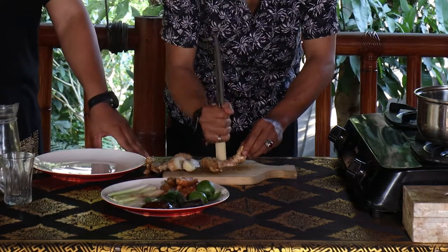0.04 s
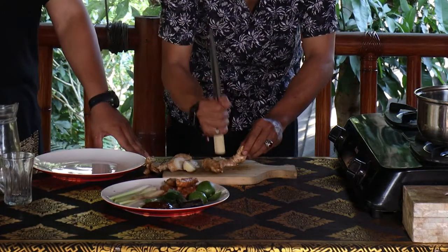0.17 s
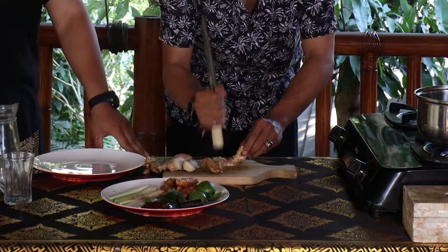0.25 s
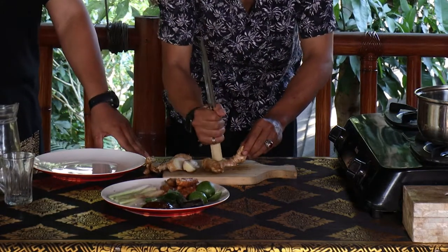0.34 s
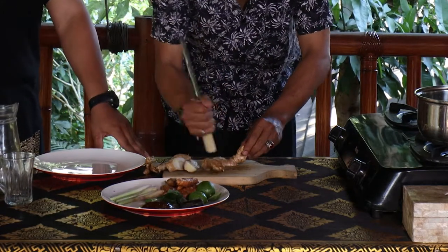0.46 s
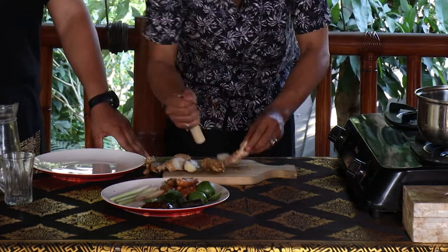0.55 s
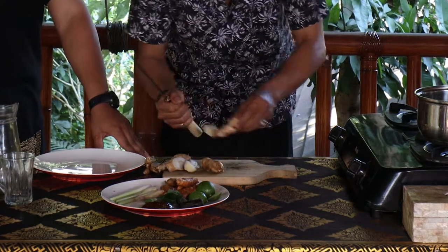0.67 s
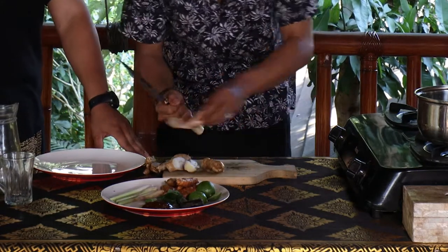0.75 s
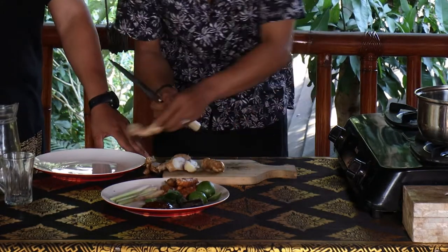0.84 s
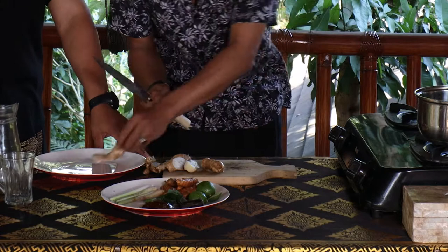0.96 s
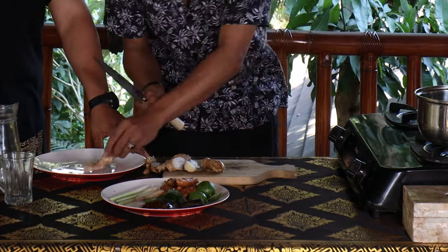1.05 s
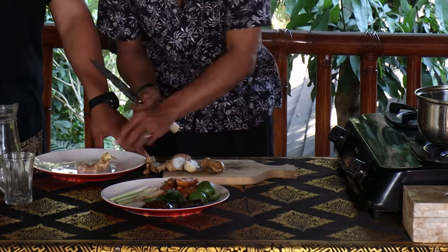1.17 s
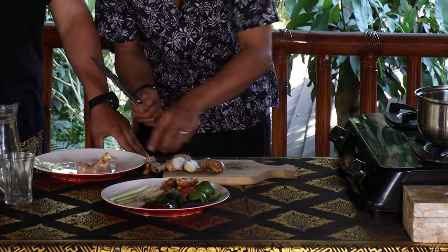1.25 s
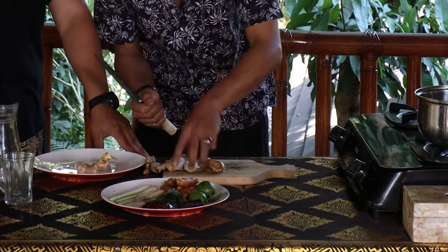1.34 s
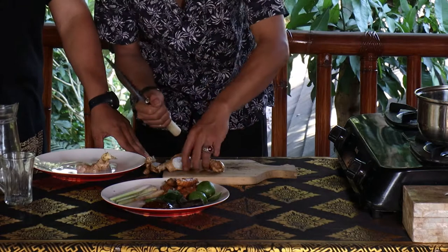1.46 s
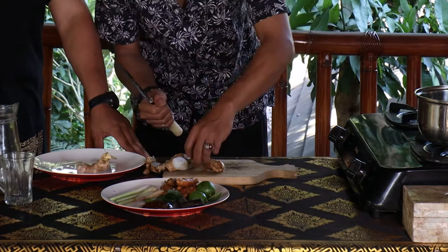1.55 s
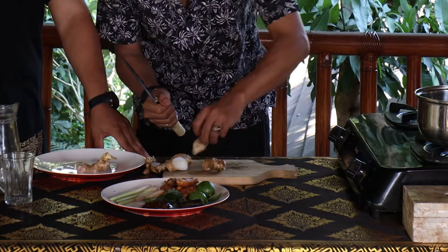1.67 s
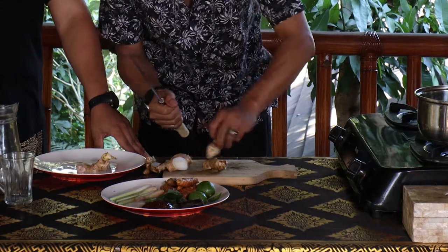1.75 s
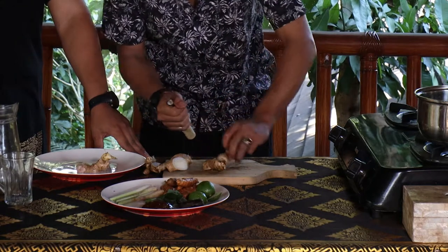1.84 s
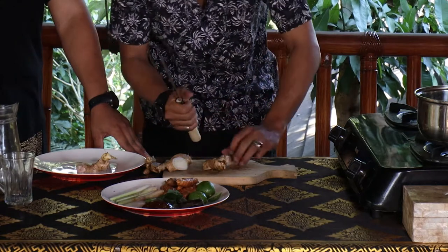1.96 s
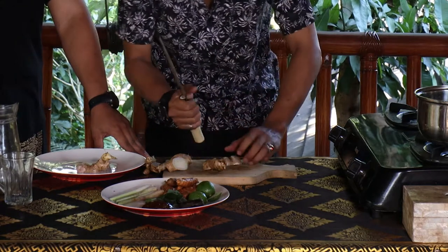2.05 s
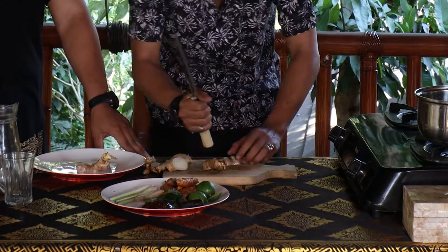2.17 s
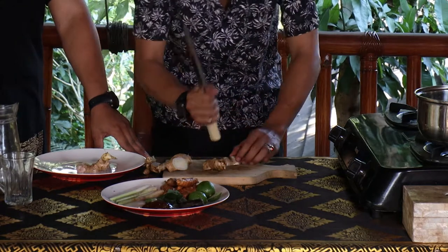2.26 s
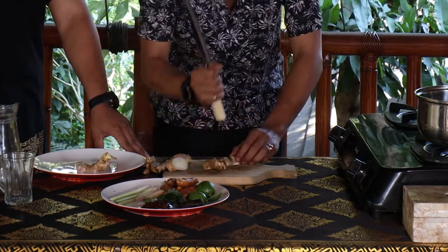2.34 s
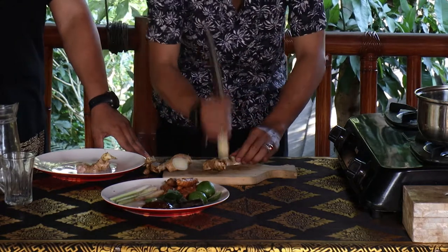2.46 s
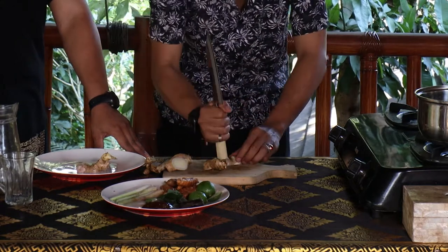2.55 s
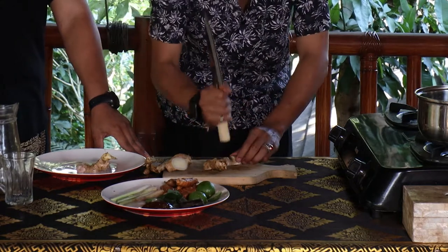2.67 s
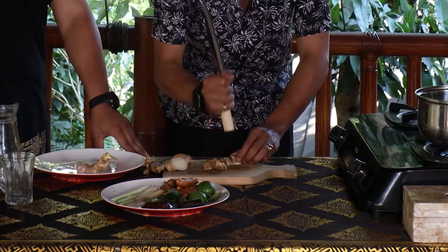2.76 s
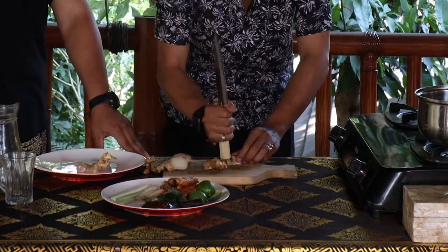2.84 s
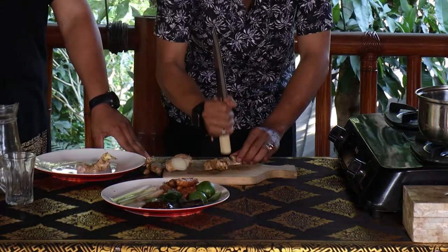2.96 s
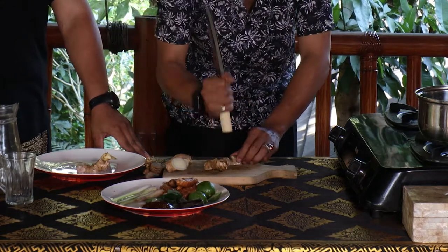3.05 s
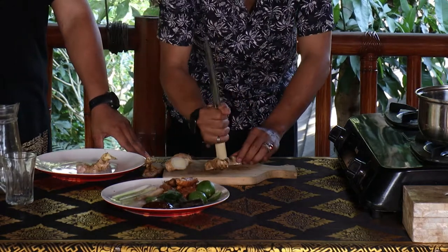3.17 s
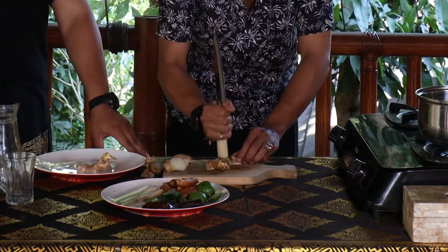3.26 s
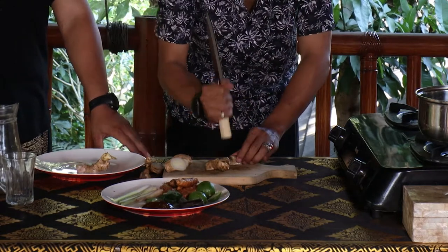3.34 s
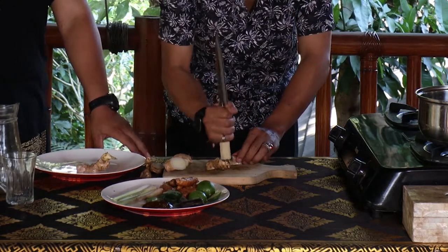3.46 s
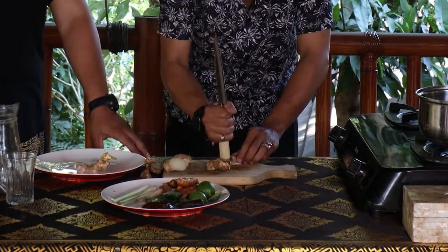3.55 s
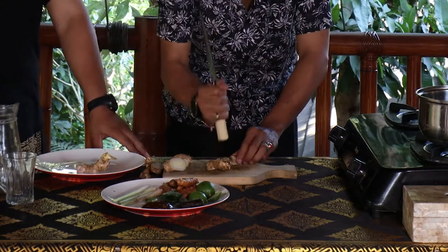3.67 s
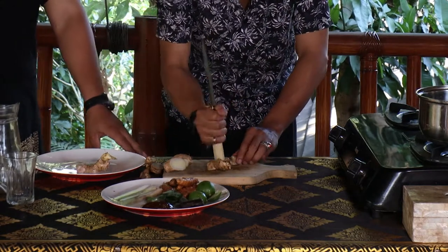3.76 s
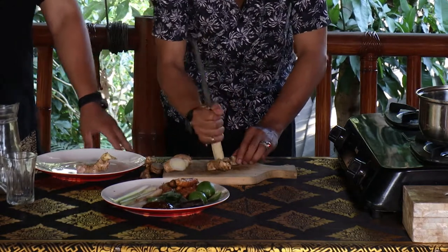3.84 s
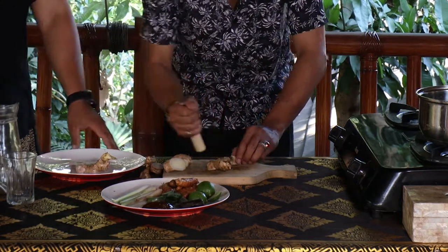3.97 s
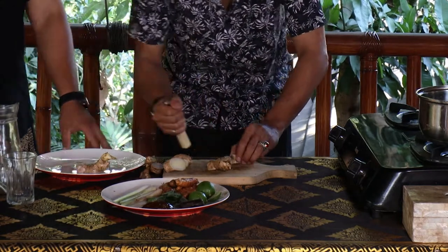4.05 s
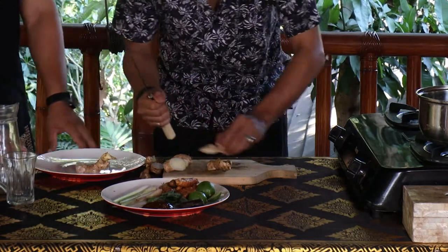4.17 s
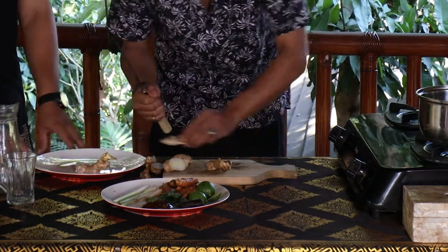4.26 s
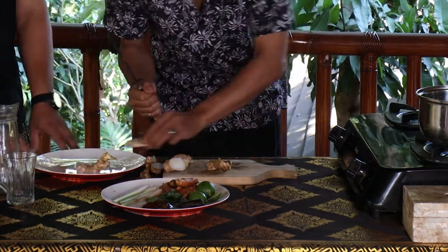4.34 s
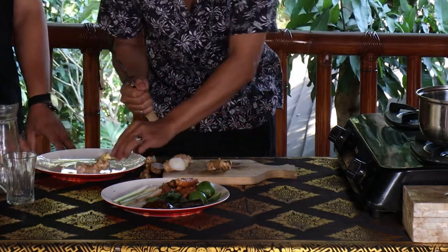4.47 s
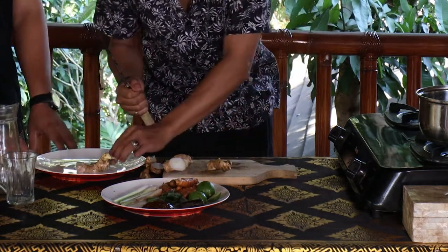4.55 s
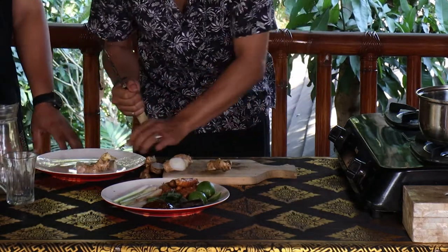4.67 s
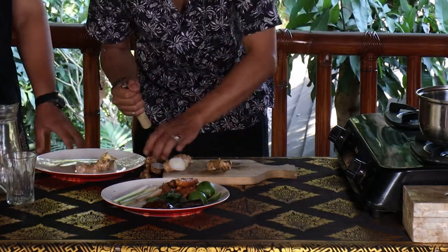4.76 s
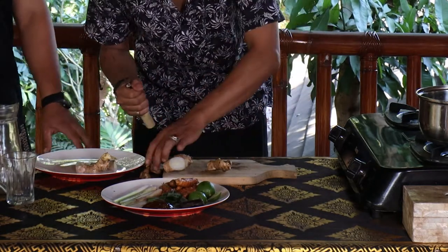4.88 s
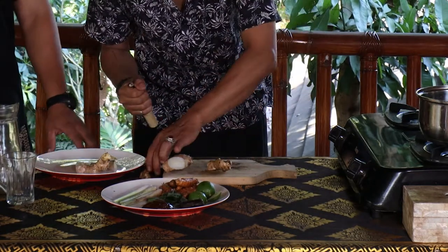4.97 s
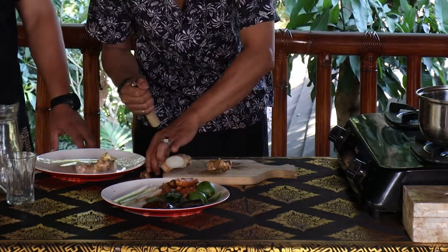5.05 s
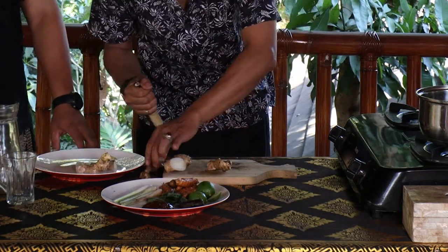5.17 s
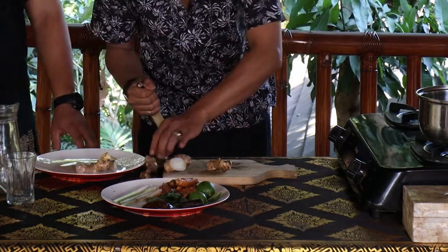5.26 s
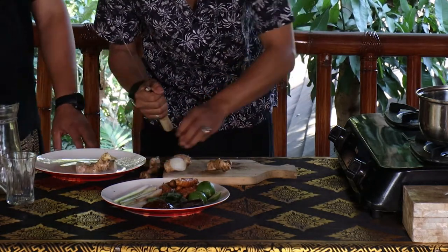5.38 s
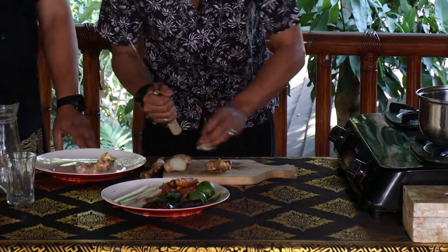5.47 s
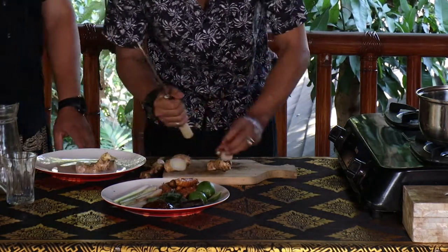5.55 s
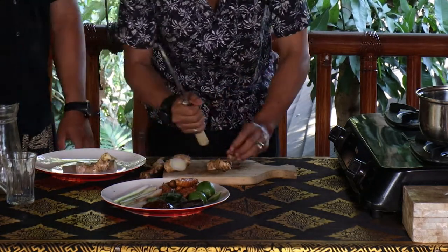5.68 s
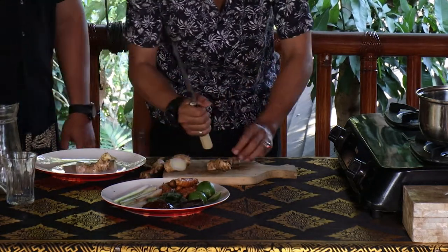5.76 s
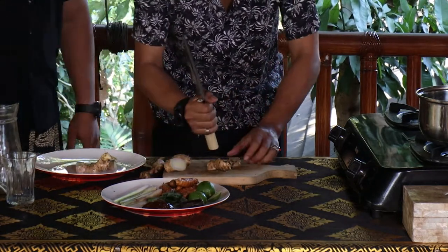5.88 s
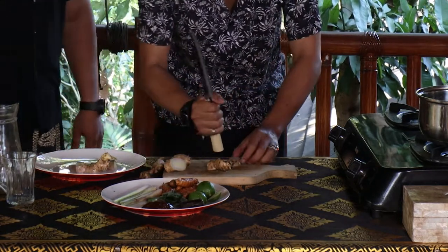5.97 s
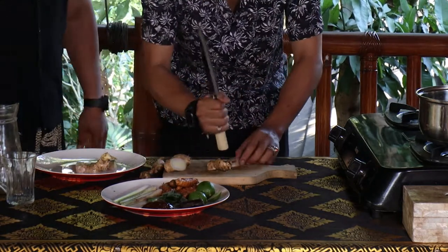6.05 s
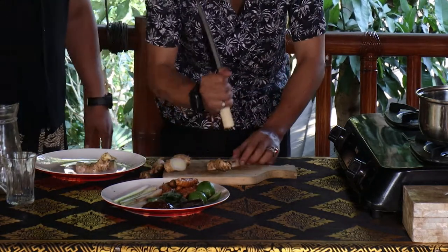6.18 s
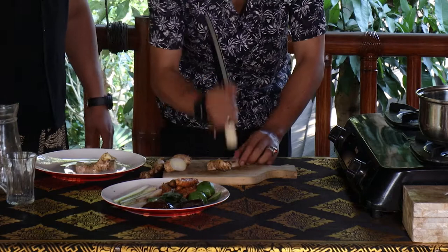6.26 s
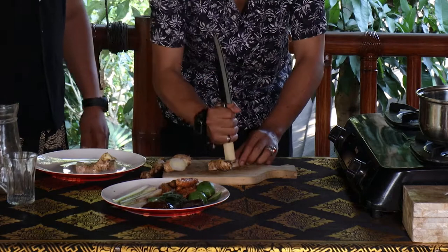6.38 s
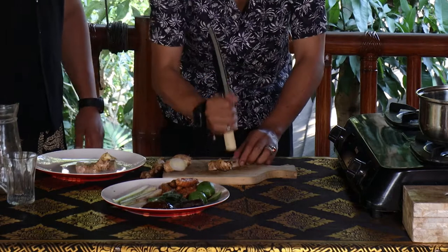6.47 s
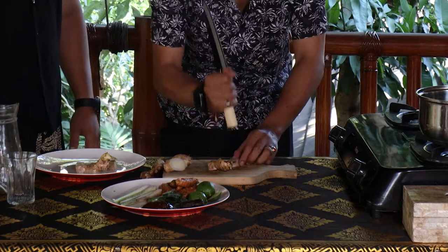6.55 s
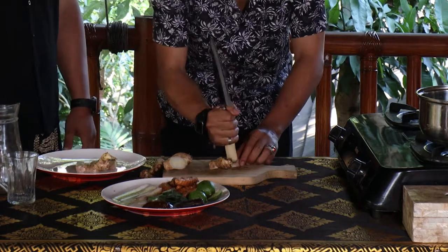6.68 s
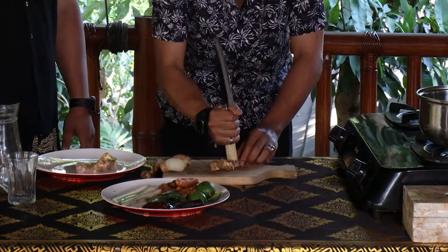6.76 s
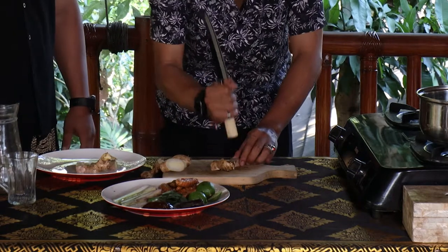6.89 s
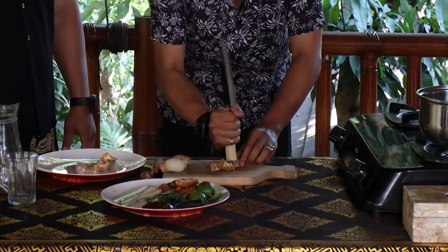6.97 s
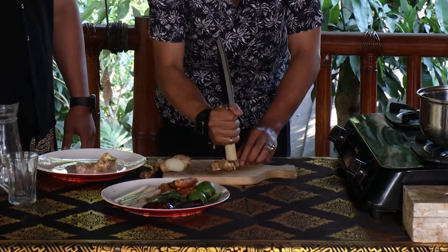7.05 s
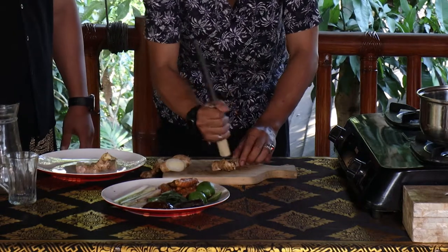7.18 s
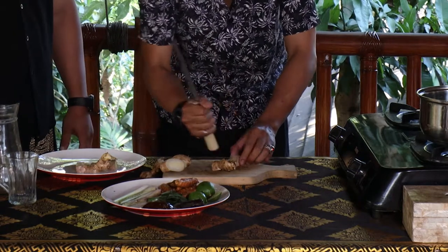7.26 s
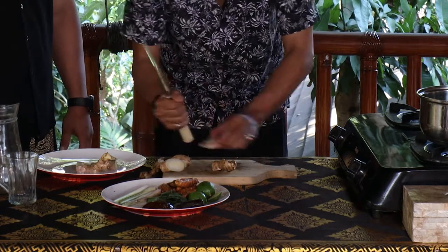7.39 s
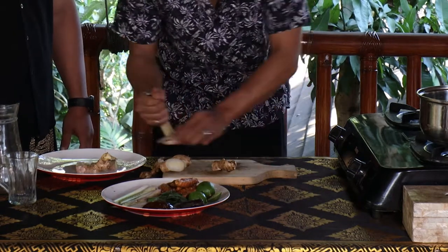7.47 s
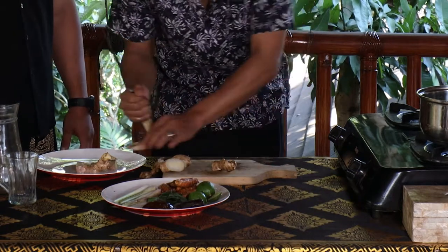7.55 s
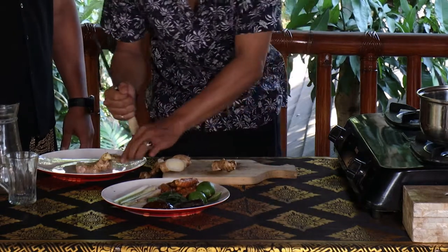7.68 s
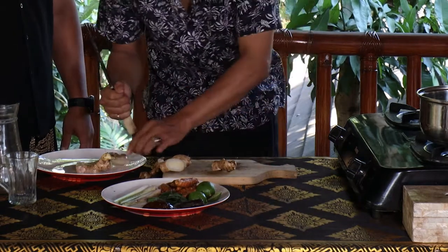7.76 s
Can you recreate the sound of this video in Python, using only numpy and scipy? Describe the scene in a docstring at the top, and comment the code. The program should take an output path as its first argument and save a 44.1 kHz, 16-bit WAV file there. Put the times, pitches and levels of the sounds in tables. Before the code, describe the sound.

On an open veranda with faint insects and the odd distant bird, ginger is pounded with a knife handle on a wooden board in front of the microphone. The loud, clacking thuds come in runs of two, five and three, making the table boom, dishes rattle and a pot and the blade ring slightly. Between runs, fingers sort the pieces with quiet taps, rustles, tiny clicks and one brief plate clink.

```python
"""On an open veranda, a knife butt smashes ginger on a wooden board: two blows, then hands sort the pieces.
Five more blows follow, more sorting with one clink of a plate, and a last three blows.
At each blow the board thuds, buzzes, lifts and slaps down again; the table booms, dishes rattle,
and a pot and the blade ring on. All the while there are small bright clicks, and insects sing in the
garden, where a few far birds call."""
import sys
import numpy as np
from scipy import signal
from scipy.fft import rfft, irfft, next_fast_len
from scipy.io import wavfile

SR = 44100
rng = np.random.default_rng(int(sys.argv[2]) if len(sys.argv) > 2 else 0)


def to_wav(s):
    """Save 16-bit WAV."""
    ch = np.atleast_2d(s).T  # columns
    pcm = np.round(np.clip(ch, -1, 1) * 32767)  # PCM
    wavfile.write(sys.argv[1], SR, pcm.astype(np.int16))


N = 344862

# The knife blows. Each row: start in seconds, force in dB, hardness in dB, seconds until the board
# lands, then the strength in dB of the landing, the pot's ring and the blade's ring.
KNIFE_BLOWS = [(.0821, -.5, 1.5, 0.051, -2.5, -20, -9), (0.3633, -.5, -7, 0.049, -3.5, -27, -5),
               (2.5551, -1.5, -3, 0.048, -1.5, -14, 1), (2.8958, 0, -1.5, 0.05, -2, -13, -1),
               (3.2127, 0, -4, 0.049, -1, -10, -5), (3.5176, 1.5, -3, 0.05, -.5, -6, -11),
               (3.8015, -1, -11, .056, -8.5, -15, -14), (6.3664, -3, -9.5, 0.047, -5.5, -15, -14),
               (6.722, 1, -6, .0545, 2.5, 0.5, -3), (7.0439, -1, -8, 0.052, 0.5, -4, -4)]

# The tones of struck things. Each row: pitch in Hz, relative level in dB, seconds to fade by 60 dB.
BOARD_TONES = [(203, 2, 0.014), (378, -1, 0.014), (630, -10, 0.021), (831, -14.5, 0.061)]
SLAP_TONES = [(327.4, 1, 0.033), (474, 0, 0.015), (738, 0.5, 0.021), (1128, -2.5, 0.0091),
              (1385, -2, 0.0046)]  # the board falling flat on the table
HANDLE_TONES = [(1440, -9, 0.012), (1644, -11.5, 0.016), (2520, -16, 0.018), (3082, -6, 0.0086),
                (4510, -14, 0.0061), (5120, -18.5, 0.012), (6500, -9, 0.002), (8560, -23.5, 0.0073),
                (11100, -24, .003)]
TABLE_TONES = [(78, -5, .2), (96, -2, .2), (116, -2, .2), (148, -8, .2), (169, -4, .2), (212, -3, .2),
               (239, 0, .2), (269, -1, .2), (301, 1, .24), (357, 0, .2), (420, 0, .15), (489, 3, .18),
               (602, 0, .15), (662, -2, .15), (721, -2, .15), (804, -3, .15), (888, -3, .15),
               (985, -3, .15), (1092, -5, .14), (1640, -14, .16), (2013, -20, .2), (2213, -21, .16)]
CLACK_TONES = [(630, -2, 0.043), (930, 2, 0.033), (1093, -0.5, 0.02), (1550, -7, .025), (2100, -17.5, .03)]  # loose things on the table
POT_TONES = [(581, -43, .55), (1028, -48, .5), (1211, -34, .95), (1238, -42, .6)]
BLADE_TONES = [(2460, -54.5, .4), (5196, -50, 0.74), (5707, -58, 0.72), (6853, -65, .9)]
PLATE_TONES = [(2410, -5, .14), (3610, 0, .12), (3720, -5, .12), (6000, -14, .1)]
THUD_TONES = [(182, -8, .09), (306, -4.5, 0.087), (396, -5, 0.083), (492, -5, .08)]  # a light touch on the board: its dull part,
TAP_TONES = [(717, -12.5, 0.03), (916, 5, 0.027), (1134, -0.5, 0.023), (1410, -2.5, 0.026)]  # its woody part
TICK_TONES = [(1950, -6, .04), (2450, -7, .04), (3150, -4, .04), (4400, -14, .02)]  # and its bright part

# The colours of the noises. Each row: frequency in Hz, relative level in dB.
SHUDDER_COLOUR = [(30, -23), (60, -41), (100, -18), (170, -10), (300, -7.5), (500, 1.5), (800, -7),
                  (1150, -6), (1600, -14.5), (2200, -20.5), (4000, -42), (16000, -53)]
RATTLE_COLOUR = [(500, -41), (1000, -35.5), (1600, 4), (2200, 2), (3100, 1), (4000, -2.5), (5200, -5),
                 (7000, -10), (9000, -15.5), (12000, -18), (16000, -61)]
ECHO_COLOUR = [(40, -30), (120, -9), (300, 0.5), (600, 2.5), (1000, -1.5), (1600, -11), (3000, -17.5),
               (6000, -26.5), (16000, -48)]
AIR_COLOUR = [(15, -42), (25, -13), (141, -2), (384, -4.5), (439, -3.5), (591, 1.5), (1290, -1), (1700, 1),
              (2910, -7.5), (3250, -5.5), (3820, -11.5), (5570, -16.5), (6380, -17.5), (12900, -19),
              (16000, -37)]
SCUFF_COLOUR = [(150, -1), (500, 3), (1100, -2), (2000, 2), (4000, -32), (16000, -35)]
CLICK_COLOUR = [(1500, -22), (3500, 0), (6500, -1), (8500, 4.5), (11000, -3), (16000, -22)]
HISS_COLOUR = [(30, 7), (300, 8), (1500, 5.5), (5000, -4.5), (12000, -1), (16000, -12)]

# Ginger and knife are set down. Each row: start in seconds, then thud, tap and tick strength in dB.
SET_DOWNS = [(1.191, -38, -45, -51), (1.208, -46, -41, -49), (1.663, -52, -39, -46), (2.102, -39, -31, -54),
             (2.391, -52, -50, -39), (3.093, -32, -34, -50), (4.662, -38, -43, -41), (5.211, -35, -51, -50),
             (5.326, -53, -49, -39), (5.635, -32, -45, -52), (5.864, -35, -32, -41), (7.763, -42, -51, -52)]
# The free hand sorts the pieces. Each row: start in seconds, end in seconds.
SORTING_TIMES = [(.95, 2.5), (4.15, 6.05)]
# Ginger lands on the plate. Each row: start in seconds, strength in dB.
PLATE_HITS = [(4.665, -41)]
# Small bright clicks as the knife hand moves, mostly just before a blow.
# Each row: start in seconds, strength in dB.
HAND_CLICKS = [(3.7718, -28), (6.3361, -25), (6.6787, -25), (7.0107, -24.5), (7.339, -28.5)]
# Far bird calls and, last, one brief chirp of the near insect.
# Each row: start in seconds, length in seconds, pitch in Hz, width in Hz, level in dB.
GARDEN_CALLS = [(2.67, 0.11, 2470, 30, -56), (2.793, .06, 3400, 60, -60), (5.614, 0.49, 1540, 220, -54),
                (5.977, .14, 3176, 30.2, -52.5)]
# Steady insect choirs. Each row: pitch in Hz, width in Hz, level in dB.
INSECT_CHOIRS = [(3265, 290, -69), (12700, 830, -67)]
# Thin, high whistles. Each row: pitch in Hz, level in dB.
HIGH_WHISTLES = [(12605, -68.5), (12290, -80)]


def board_knocks():
    """The knife drives the board down; it lifts and lands. Returns its sound and its push on the table."""
    start, force, _, flight, landing = np.transpose(KNIFE_BLOWS)[:5]
    blows = band(clicks(start, from_db(force)), 1370, "low")
    landings = band(clicks(start + flight, from_db(landing)), 1470, "low")
    thud = from_db(-1.5) * body(blows, BOARD_TONES)
    contacts = from_db(-6.5) * board_chatter(start, force) + from_db(-8.5) * landings
    slaps = body(contacts, SLAP_TONES)
    return -thud - slaps, blows + from_db(-2) * landings


def board_chatter(start, force):
    """Just after a blow the board buzzes against the table, ever harder, until it lifts off."""
    count, delay_s, rate_hz, growth_db = 7, .0082, 491.2, 1.6
    step = np.arange(count)
    shape = (len(start), count)
    times = start[:, None] + delay_s + step / rate_hz + rng.normal(0, .00007, shape)
    db = force[:, None] + growth_db * (step - count + 1) + 2 * rng.standard_normal(shape)
    return band(clicks(times.ravel(), from_db(db).ravel()), 1620, "low")


def handle_crack():
    """The ginger cushions the handle: a harder hit is shorter, so it is louder and brighter."""
    start, _, hardness = np.transpose(KNIFE_BLOWS)[:3]
    contact = sum(band(clicks([t], from_db(db)), 9000 * from_db(.93 * db), "low")
                  for t, db in zip(start, hardness))
    ringing = sum(from_db(db) * ring(-contact, hz, t60) for hz, db, t60 in HANDLE_TONES)
    return from_db(-1.5) * band(ringing, 1050, "high")


def table_boom(push):
    """The table top booms, a little differently each time, as the blows land on different spots."""
    start = np.transpose(KNIFE_BLOWS)[0]
    latest_blow = np.clip(np.searchsorted(start, np.arange(N) / SR + .001) - 1, 0, None)
    strengths = from_db(1.6 * rng.standard_normal((len(start), len(TABLE_TONES))))
    boom = sum((-1) ** k * from_db(db) * ring(push * strengths[latest_blow, k], hz, t60)
               for k, (hz, db, t60) in enumerate(TABLE_TONES))
    return from_db(-23.5) * boom


def furniture_shudder():
    """Countless higher tones of table and stove blur into noise at each blow and landing."""
    start, force, _, flight, landing = np.transpose(KNIFE_BLOWS)[:5]
    at_blow = swell(start + .007, force - 19.5, rise=.0016, t60=.28)
    at_landing = swell(start + flight, landing - 17.5, rise=.00026, t60=.16)
    return np.hypot(at_blow, at_landing) * noise(SHUDDER_COLOUR)


def hopping_clacks():
    """Plates and stove hop on the jolted table and knock down a few times, ever more weakly."""
    count, delay_s, gap_s, spread_s, loss_db = 4, .018, .017, .003, 2
    start, _, _, _, landing = np.transpose(KNIFE_BLOWS)[:5]
    hop = np.arange(count)
    scatter = spread_s * (hop + .5) * rng.standard_normal((len(start), count))
    times = start[:, None] + delay_s + gap_s * hop + scatter
    db = -17.5 + .94 * landing[:, None] - loss_db * hop
    return band(struck(CLACK_TONES, times.ravel(), db.ravel(), vary_db=2.5), [500, 2200], "band")


def dish_rattle():
    """Plates, glasses and stove parts make a spray of tiny hits, louder when the board lands harder."""
    start, _, _, flight, landing = np.transpose(KNIFE_BLOWS)[:5]
    shake_db = -5 + .62 * landing
    at_blow = swell(start + .0097, shake_db - 29, rise=.0057, t60=.29)
    at_landing = swell(start + flight, shake_db - 27, rise=.0011, t60=.13)
    flicker = from_db(1.3 * rms_one(band(rng.standard_normal(N), 380, "low")))
    return np.hypot(at_blow, at_landing) * rms_one(noise(RATTLE_COLOUR) * flicker)


def steel_ring():
    """The jolt of the landing board sets the steel pot and the knife blade ringing."""
    start, _, _, flight, _, pot_db, blade_db = np.transpose(KNIFE_BLOWS)
    pot = struck(POT_TONES, start + flight, pot_db, vary_db=-1)
    blade = struck(BLADE_TONES, start + flight, blade_db, vary_db=-2.5)
    return pot + blade


def roof_echo():
    """A faint echo of each blow lingers under the roof."""
    start, force = np.transpose(KNIFE_BLOWS)[:2]
    return swell(start + .019, force - 33, rise=.018, t60=.56) * noise(ECHO_COLOUR)


def handling():
    """Each small touch mixes a dull thud, a woody tap, a bright tick and a brief scuff."""
    start, thud_db, tap_db, tick_db = np.vstack([SET_DOWNS, light_touches()]).T
    thud = struck(THUD_TONES, start, thud_db - 4.5, vary_db=1.5)
    tap = struck(TAP_TONES, start + .00095, tap_db - .5, vary_db=2.5)
    tick = struck(TICK_TONES, start, tick_db, vary_db=2)
    scuff = swell(start, tap_db - 10, rise=.00077, t60=.076) * noise(SCUFF_COLOUR)
    return band(thud, 140, "high") + band(tap, 550, "high") + band(tick, 1700, "high") + scuff


def light_touches():
    """Sorting fingers brush the pieces at uneven times. Returns rows like those of SET_DOWNS."""
    per_second, thud_db, tap_db, tick_db = 3.2, -54.5, -48.5, -50
    even_times = np.concatenate([np.arange(start, end, 1 / per_second) for start, end in SORTING_TIMES])
    chance = rng.standard_normal((len(even_times), 4))
    times = even_times + chance[:, 0] / (np.pi * per_second)
    levels = np.array([thud_db, tap_db, tick_db]) + 1.5 * chance[:, 1:]
    return np.column_stack([times, levels])


def plate_clink():
    """A piece of ginger makes the china plate ring briefly."""
    start, db = np.transpose(PLATE_HITS)
    return struck(PLATE_TONES, start, db, vary_db=1)


def bright_clicks():
    """Tiny bursts of bright noise: a few clear ones as the knife hand moves, many faint random ones."""
    per_second, faint_db, spread_db = 11, -39.5, 2.8
    samples = np.flatnonzero(rng.random(N) < per_second / SR)
    faint = np.column_stack([samples / SR, faint_db + spread_db * rng.standard_normal(N)[samples]])
    start, db = np.vstack([HAND_CLICKS, faint]).T
    return swell(start, db - 14, rise=.00045, t60=.02) * noise(CLICK_COLOUR)


def rustle():
    """Sleeves, skins and leaves crackle at random on many pitches, a bit louder while the hand sorts."""
    grains_per_pitch, range_db, sorting_boost_db = 55, 10, 2.5
    crackle = 0
    for hz in np.geomspace(520, 3000, num=22):
        when, size = rng.random((grains_per_pitch, 2)).T
        times = when * N / SR
        sorting = sum((start < times) & (times < end) for start, end in SORTING_TIMES)
        treble_loss_db = 1.15 * np.log2(hz / 450)
        db = -51.5 + range_db * size ** 2 + sorting_boost_db * sorting - treble_loss_db
        grains = ring(clicks(times, from_db(db)), hz, t60=.022)
        crackle = crackle + band(grains, [hz / 1.5, hz * 1.5], "band", order=1)
    return crackle


def garden_calls():
    """Far birds call and the near insect chirps once: narrow bands of noise that fade in and out."""
    t = np.arange(N) / SR
    return sum(from_db(db) * np.sin(np.pi * np.clip((t - start) / length, 0, 1)) * buzz(hz, width)
               for start, length, hz, width, db in GARDEN_CALLS)


def near_insect():
    """A thin whine with one overtone wavers in pitch and level."""
    hz = 3180 + 10 * drift(3)
    whine = buzz(hz, width_hz=24) + from_db(-14) * buzz(2 * hz, width_hz=50)
    return from_db(-65 + 1.5 * drift(5)) * whine


def swelling_insect():
    """A high insect sings in regular rounds, getting louder and higher as its effort rises."""
    effort = (1 + cycle(period_s=2.31, top_s=.39)) / 2
    return from_db(-72.5 - 26 * (1 - effort)) * buzz(12950 + 750 * effort, width_hz=450)


def whistles():
    """Thin, high tones sway together in pitch, and each flutters in level."""
    sway_hz = 45 * cycle(period_s=1.46, top_s=.76) + 8 * drift(120)
    tones = 0
    for hz, db in HIGH_WHISTLES:
        flutter = from_db(4 * drift(12))
        tone = np.sin(2 * np.pi * np.cumsum(hz + sway_hz) / SR)
        tones = tones + from_db(db) * rms_one(flutter * tone)
    return tones


def garden():
    """Garden air and insects sit a little to the right, whistles in the middle, soft hiss in each ear."""
    air = from_db(-53 + .88 * drift(1.36)) * noise(AIR_COLOUR)
    choirs = sum(from_db(db) * buzz(hz, width) for hz, width, db in INSECT_CHOIRS)
    hiss = from_db(-62) * np.array([noise(HISS_COLOUR), noise(HISS_COLOUR)])
    return (air + choirs + swelling_insect()) * from_db([[-.9], [.9]]) + whistles() + hiss


def from_db(db):
    """Turns decibels into a factor to multiply by."""
    return 10 ** (np.asarray(db) / 20)


def rms_one(x):
    """Scales a signal to an average power of 1."""
    return x / np.sqrt(np.mean(x ** 2) + 1e-20)


def clicks(times, sizes):
    """One click at each time, given in seconds."""
    track = np.full(N, 1e-18)
    samples = np.round(np.asarray(times) * SR).astype(int)
    np.add.at(track, np.clip(samples, 0, N - 1), sizes)
    return track


def band(x, hz, kind, order=2):
    """Keeps the lows, the highs or a band in between."""
    sections = signal.butter(order, np.clip(hz, 10, .47 * SR), kind, fs=SR, output="sos")
    return signal.sosfilt(sections, x)


def ring(x, hz, t60):
    """Each click in x starts a pure tone that fades by 60 dB in t60 seconds."""
    decay, angle = from_db(-60 / (t60 * SR)), 2 * np.pi * hz / SR
    return signal.lfilter([0, np.sin(angle)], [1, -2 * decay * np.cos(angle), decay * decay], x)


def body(push, tones):
    """A push rings all the tones of an object; neighbouring tones swing in opposite directions."""
    return sum((-1) ** k * from_db(db) * ring(push, hz, t60) for k, (hz, db, t60) in enumerate(tones))


def struck(tones, times, level_db, vary_db):
    """Every hit rings every tone, each with a slightly random strength."""
    chance = rng.standard_normal((len(times), len(tones)))
    return sum(ring(clicks(times, from_db(level_db + db + vary_db * chance[:, k])), hz, t60)
               for k, (hz, db, t60) in enumerate(tones))


def swell(times, level_db, rise, t60):
    """A loudness curve that builds after each hit and dies away; rise and t60 are in seconds."""
    fall, smoothing = from_db(-120 / (t60 * SR)), np.exp(-1 / (rise * SR))
    power = signal.lfilter([1], [1, -fall], clicks(times, from_db(level_db) ** 2))
    return np.sqrt(signal.lfilter([1 - smoothing], [1, -smoothing], power))


def noise(colour):
    """Steady noise of the given colour."""
    hz, db = np.transpose(colour)
    size = next_fast_len(N)
    frequencies = np.maximum(np.arange(size // 2 + 1) * SR / size, 1)
    gains = from_db(np.interp(np.log(frequencies), np.log(hz), db))
    return rms_one(irfft(rfft(rng.standard_normal(size)) * gains, size)[:N])


def buzz(hz, width_hz):
    """A narrow band of noise around a steady or gliding pitch."""
    phase = 2 * np.pi * np.cumsum(hz * np.ones(N)) / SR
    a, b = band(rng.standard_normal((2, N)), width_hz / 2, "low")
    return rms_one(a * np.cos(phase) + b * np.sin(phase))


def drift(per_second):
    """A wandering curve that heads for a new random value this many times a second."""
    points = rng.standard_normal(int(N / SR * per_second) + 2)
    return rms_one(np.interp(np.arange(N) / SR * per_second, np.arange(len(points)), points))


def cycle(period_s, top_s):
    """A slow swing between -1 and 1 that peaks at top_s."""
    return np.cos(2 * np.pi * (np.arange(N) / SR - top_s) / period_s)


def scene():
    """Everything on the table is straight ahead; the garden leans to the right."""
    board, push = board_knocks()
    blows = board + handle_crack() + table_boom(push) + furniture_shudder()
    blows = blows + hopping_clacks() + dish_rattle() + steel_ring() + roof_echo()
    # board and table are too small to give off deep bass
    blows = band(band(blows, 98, "high", order=1), 22, "high")
    small_sounds = handling() + plate_clink() + bright_clicks() + rustle()
    background = garden() + (garden_calls() + near_insect()) * from_db([[-.7], [.7]])
    return blows + small_sounds + background


def record(dry):
    """Rounds off the highest peaks and cuts the very top of the treble."""
    ceiling, cutoff_hz = .97, 15600
    rounded = dry / (1 + np.abs(dry / ceiling) ** 6) ** (1 / 6)
    return signal.sosfilt(signal.ellip(10, .1, 80, cutoff_hz, fs=SR, output="sos"), rounded)


dry = scene()
out = record(dry)
to_wav(out)
```